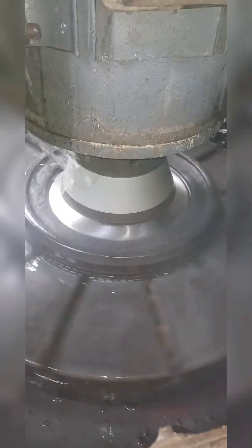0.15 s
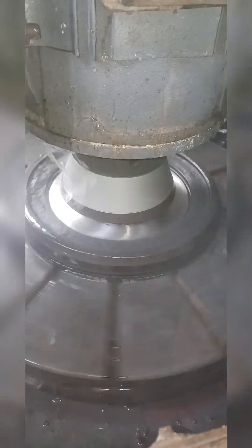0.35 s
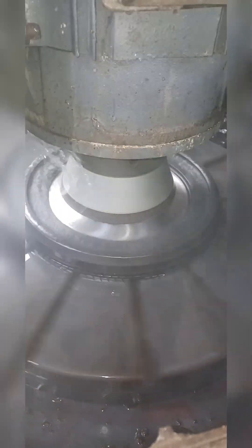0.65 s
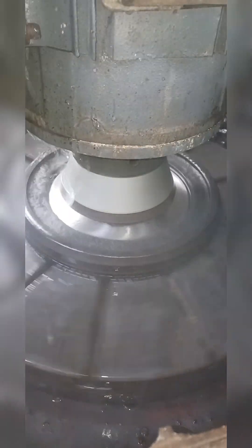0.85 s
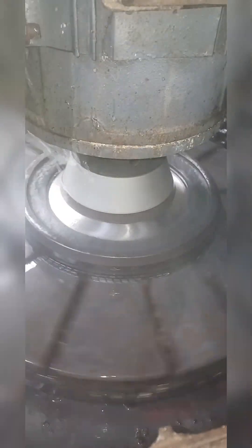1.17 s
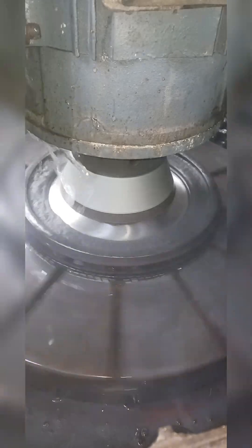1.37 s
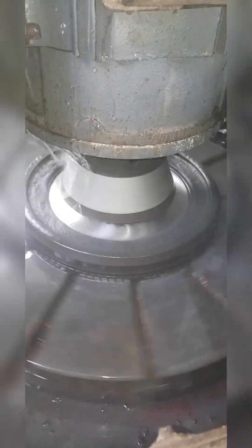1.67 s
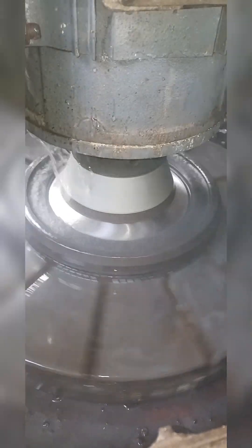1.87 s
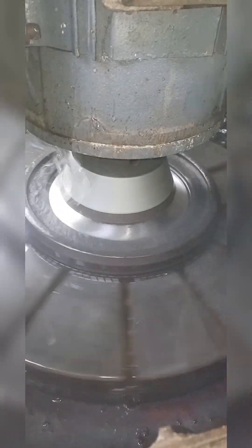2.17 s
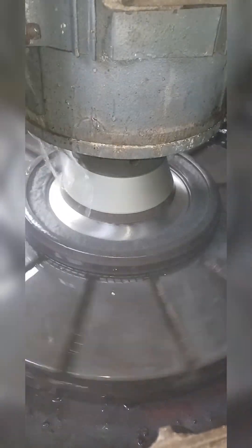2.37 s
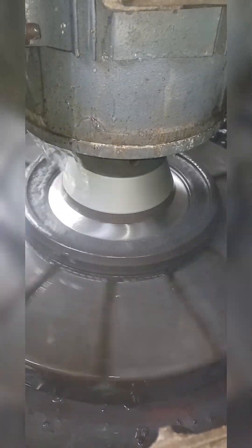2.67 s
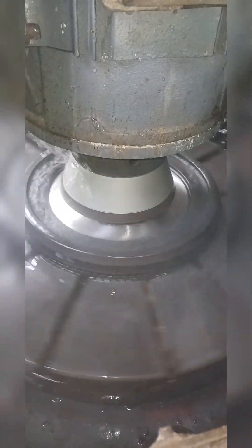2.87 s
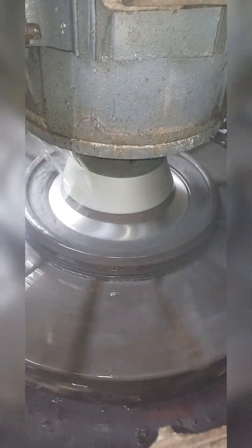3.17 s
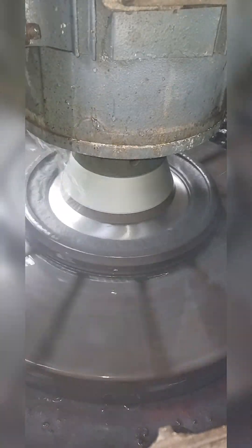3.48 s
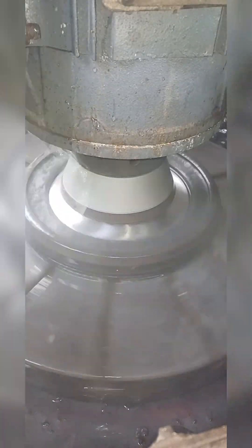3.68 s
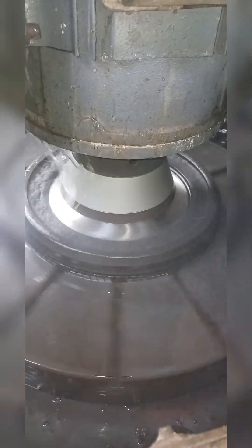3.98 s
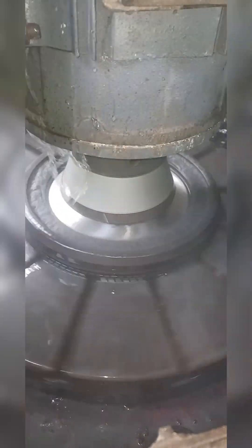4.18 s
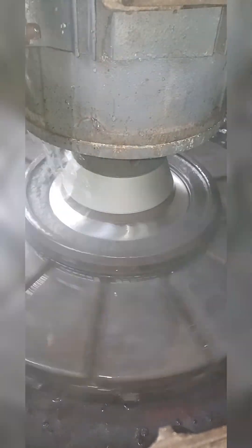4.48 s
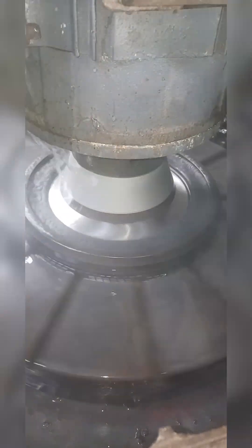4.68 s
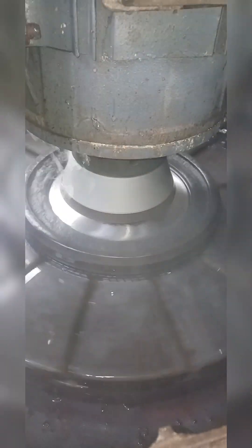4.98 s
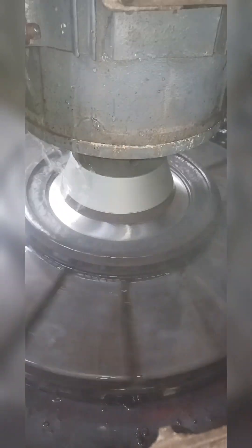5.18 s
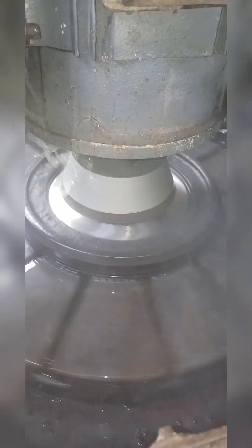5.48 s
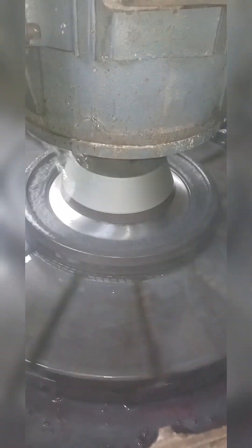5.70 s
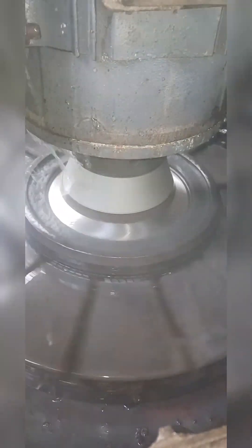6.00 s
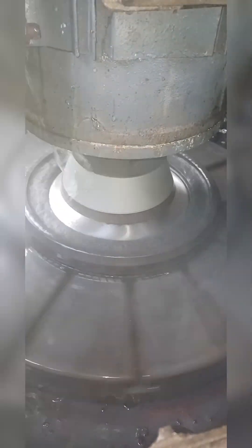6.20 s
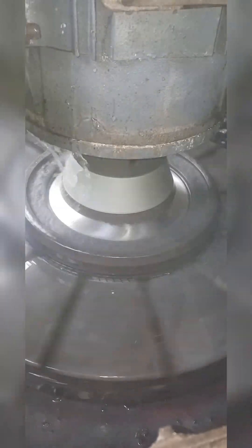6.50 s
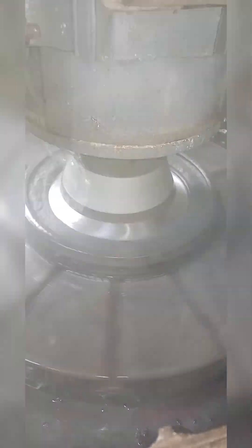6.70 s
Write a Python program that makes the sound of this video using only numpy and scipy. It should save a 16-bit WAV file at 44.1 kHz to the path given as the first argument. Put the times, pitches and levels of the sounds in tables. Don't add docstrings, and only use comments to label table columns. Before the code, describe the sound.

A cup grinding wheel cuts a rotating steel flywheel without pause. A very high, piercing squeal dominates, roughened by a fast flutter and swelling roughly every seven tenths of a second, with weaker surges between. Gritty hiss, splashing coolant, ringing steel and a low motor hum sit underneath. Close stereo microphone, brief workshop echo.

```python
import sys
import numpy as np
from scipy import signal
from scipy.fft import rfft, irfft, next_fast_len
from scipy.io import wavfile
from scipy.ndimage import uniform_filter1d

SR = 44100
rng = np.random.default_rng(int(sys.argv[2]) if len(sys.argv) > 2 else 0)


def unload_audio(sound):
    columns = np.transpose(np.atleast_2d(sound))
    steps = np.round(np.clip(columns, -1, 1) * 32767)
    wavfile.write(sys.argv[1], SR, steps.astype(np.int16))


def how_loud(loudness_db):
    steps = np.asarray(loudness_db, float) / 20
    return 10 ** steps


N = 302085
TIME = np.arange(N) / SR
WHEEL_HZ = 59.4


def unit(x):
    return x / np.sqrt(np.mean(np.abs(x) ** 2) + 1e-20)


def along(points, hz):
    f, v = np.transpose(points)
    return np.interp(np.log(hz + 1), np.log(f + 1), v)


def curves(rows, at=TIME, period=None):
    places, *cols = np.transpose(rows)
    return [np.interp(at, places, c, period=period) for c in cols]


def wobble(rate, t=TIME):
    knots = rng.standard_normal(int(N * rate / SR) + 2)
    return unit(np.interp(t * rate, np.arange(len(knots)), knots))


def fading(rate, steady, t):
    steady = np.clip(steady, 0, 1)
    drift = wobble(rate, t) + 1j * wobble(rate, t)
    return np.sqrt(steady) + np.sqrt((1 - steady) / 2) * drift


def rush(response):
    # (frequency [Hz], likeness of left and right [-1 to 1])
    alike = [(30, -0.45), (80, 0.11), (180, 0.54), (540, 0.09), (2800, -0.066), (3520, 0.47), (4400, -0.36),
             (14900, 0.15)]
    # (frequency [Hz], left over right [dB])
    lean = [(60, 0.5), (180, 1), (540, -2.5), (1640, 0), (4950, 3.5), (14900, 2.5)]
    m = next_fast_len(N + 8192)
    hz = np.fft.rfftfreq(m, 1 / SR)
    spread = np.arccos(np.clip(along(alike, hz), -1, 1)) / 2
    noise = rfft(rng.standard_normal((2, m))) * response(hz)
    mid, side = noise * [np.cos(spread), np.sin(spread)]
    tilt = how_loud(along(lean, hz) / 2)
    return unit(irfft([(mid + side) * tilt, (mid - side) / tilt], m)[:, :N])


def modes(hz, rows):
    return np.sqrt(sum(how_loud(2 * db) / (1 + ((hz * hz - c * c) / (hz * w + 1)) ** 2) for c, w, db in rows))


def table():
    # (time [s], squeal [dB], pure tone [dB], grit [dB], ring flare on the way in [dB])
    passes = [(0.09, -3, -8, -2, 3), (0.442, 3, 10, 3.5, 5), (0.77, -1.5, -2, -1.5, -2),
              (1.14, 1, 1.5, 0, 3.5), (1.45, -0.5, -4, -0.4, -1), (1.818, 2, 9.5, 0.7, 4),
              (2.128, -0.5, -0.5, 0, 0.5), (2.509, 0.5, 3.5, 0.5, 1.5), (2.83, 0.5, -4, -0.2, 0),
              (3.19, 0, 7, -0.4, 2.5), (3.499, 0.6, -2.5, -0.5, 1), (3.86, 1.4, 7.5, 1.2, 1.5),
              (4.171, 1, 1.5, -0.5, -5), (4.53, -1, -2.5, -0.5, -1), (4.872, -0.5, -3.5, -1, 0),
              (5.21, 0.8, -1, -1.5, 1.5), (5.535, 0.9, 4.5, 0.5, 0.5), (5.9, 0.3, -2.5, -1, 3.5),
              (6.221, 0.5, 2.5, -.6, 0), (6.581, -0.1, -2, 1, 3), (6.91, -3, 4, -2.5, 2)]
    s, *cols = np.transpose(passes)
    marks = np.arange(len(s)) / 2
    turns = np.interp(TIME, np.r_[2 * s[0] - s[2], s], np.r_[-1, marks])
    squeal_db, pure_db, grit_db = [np.interp(turns, marks, c) for c in cols[:-1]]
    flare_db = np.interp(turns + 0.19, marks, cols[-1])
    return turns, squeal_db, pure_db, grit_db, flare_db


def load():
    # (share of a turn, grit hiss [dB], low steel ring [dB], upper ring [dB], hum [dB])
    cut_turn = [(0.0, -40.5, -50, -46, -51), (0.08, -43.5, -45.5, -47.5, -47.5),
                (0.2, -46.5, -42.5, -46, -45), (0.33, -48.5, -43, -43, -46.5), (0.53, -43, -48, -50.5, -46),
                (0.65, -45, -43, -48.5, -45.5), (0.8, -46, -35.5, -44.5, -46),
                (0.9, -46.5, -38, -46.5, -47.5)]
    # (time [s], level [dB])
    motor = [
        (0, 2.5),
        (0.7, 0),
        (1.7, 2.5),
        (2.5, 0),
        (4.3, -2),
        (5.6, 0),
        (6.85, 1),
    ]
    turns, _, _, more_db, flare_db = table()
    grit_db, ring_db, upper_db, hum_db = curves(cut_turn, turns, period=1)
    grit_db = grit_db + more_db
    ring_db = ring_db + flare_db + 1.1 * wobble(10)
    upper_db = upper_db + 0.69 * flare_db + 2.0 * wobble(8)
    hum_db = hum_db + curves(motor)[0] + 1.1 * wobble(8) + 2.46 * wobble(24)
    return grit_db, ring_db, upper_db, hum_db


def lumps(beat, depth_db):
    return how_loud(depth_db * (beat + 0.4 * wobble(45) + 1.11 * wobble(200)))


def spindle_hum(hum_db):
    # (multiple of wheel rate, level [dB])
    hum = [(1, -25.5), (2, -4.5), (3, -6), (4, 1.5), (5, -7), (6, -6.5), (7, -15.5), (8, -9.5), (9, -12),
           (10, -19), (11, -18), (12, -13.5)]
    orders = [(k * WHEEL_HZ, 10.5, db) for k, db in hum]
    return how_loud(hum_db + 3.0) * rush(lambda hz: modes(hz, orders))


def steel_ring(beat, ring_db, upper_db):
    steel_hz = [2003, 3189, 3305, 3484, 3547, 3724, 3902, 3961, 4311, 4786, 5668, 10150]
    # (width [Hz], level [dB])
    steel = [(30, -10), (30, -7.5), (30, -8.5), (28.7, 0.5), (28, -2), (35, -7), (35, -3.5), (20, 2),
             (45, -3.5), (32, -2.5), (40, -7), (350, -22.5)]
    tones = [(c, w, db) for c, (w, db) in zip(steel_hz, steel)]
    flaring = tones[3:5] + tones[-1:]
    steady = tones[:3] + tones[5:6] + tones[8:-1]
    upper = tones[6:8]
    ring = how_loud(upper_db - 1.0) * unit(lumps(beat, 1.4) * rush(lambda hz: modes(hz, upper)))
    ring = ring + how_loud(1.188 * ring_db + 4.5) * unit(lumps(beat, 1.64) * rush(lambda hz: modes(hz, flaring)))
    return ring + how_loud(0.46 * ring_db - 23.5) * unit(lumps(beat, 1.0) * rush(lambda hz: modes(hz, steady)))


def grit_and_coolant(beat, grit_db):
    # (frequency [Hz], level per Hz [dB])
    grit = [(30, -20.5), (80, -11.5), (150, -9), (450, -0.5), (850, -6.5), (2000, -4), (2700, -5),
            (3600, -6.5), (5500, -5), (6700, -0.5), (7500, -4.5), (8600, -32), (9300, -42), (10200, -20.5),
            (11300, -22)]
    colour = lambda hz: how_loud(along(grit, hz))
    low_share = lambda hz: 1 / (1 + (hz / 2600) ** 4)
    splash = rush(lambda hz: colour(hz) * low_share(hz))
    hiss = rush(lambda hz: colour(hz) * (1 - low_share(hz)))
    splash = how_loud(1.25 * grit_db + 14) * unit(lumps(beat, 1.82) * splash)
    hiss = how_loud(0.37 * grit_db - 19) * unit(lumps(beat, 1.72) * hiss)
    return splash + hiss


def cutting():
    grit_db, ring_db, upper_db, hum_db = load()
    beat = np.cos(2 * np.pi * WHEEL_HZ * TIME + 1.05 * wobble(12))
    return spindle_hum(hum_db) + steel_ring(beat, ring_db, upper_db) + grit_and_coolant(beat, grit_db)


def contact():
    # (share of a turn, squeal [dB])
    squeal_turn = [(0.0, -10.5), (0.07, -14), (0.17, -21.5), (0.25, -17.5), (0.37, -21), (0.5, -15),
                   (0.62, -16), (0.76, -19.5), (0.88, -17.5)]
    # (share of a turn, tone over side tones [dB])
    lock_turn = [
        (0.0, 12),
        (0.06, 5),
        (0.12, -6),
        (0.3, -3),
        (0.5, -11),
        (0.63, -3),
        (0.8, -7),
        (0.9, 6),
    ]
    # (share of a turn, rise [Hz])
    bend = [(0.04, 18), (0.17, 93.5), (0.33, 117.5), (0.45, 97.5), (0.55, 116.5), (0.7, 149), (0.84, 63),
            (0.96, 1)]
    # (time [s], depth [dB])
    slips = [(0.0, 8), (0.221, 2.5), (0.36, -0.5), (0.66, 3), (1.01, 4.5), (1.38, 9), (2.028, 3.5),
             (2.26, 6), (2.7, 0.5), (3.08, -1.5), (4.31, -1), (4.45, 4), (4.791, 18), (5.13, 2.5),
             (5.42, 6), (5.7, 11), (5.79, 13.5)]
    slip_s = 0.014
    turns, more_db, purer_db, _, _ = table()
    level_db, = curves(squeal_turn, turns, period=1)
    pure_db, = curves(lock_turn, turns, period=1)
    bend_hz, = curves(bend, turns, period=1)
    slips_db = sum(db * np.exp(-((TIME - s) / slip_s) ** 2) for s, db in slips)
    pitch_hz = 6990 - 4.5 * TIME + bend_hz
    level_db = level_db + more_db - slips_db + 0.6 * wobble(14)
    return pitch_hz, level_db, pure_db + purer_db + 1.5 * wobble(15)


def squeal():
    # (multiple of wheel rate, level [dB])
    sidebands = [(-9, -26), (-8, -25.5), (-7, -34), (-6, -17.5), (-5, -22), (-4, -23), (-3, -12), (-2, -16),
                 (-1, -16), (1, -13.5), (2, -17.5), (3, -17.5), (4, -28), (5, -27.5), (6, -44), (7, -56.5)]
    # (frequency [Hz], width [Hz], lift [dB])
    face = (6992, 60, 7)
    face_hz, width_hz, lift_db = face
    pitch_hz, level_db, pure_db = contact()
    step = 8
    slow = TIME[::step]
    lift = lambda hz: how_loud(lift_db / (1 + ((hz - face_hz) / width_hz) ** 2))
    snap = lambda k: -0.6 * np.arctan((k + 1.2) / 1.6)
    turn = 2 * np.pi * WHEEL_HZ * slow + 0.83 * wobble(9, slow)
    bands, power = 0, 0
    for k, db in sidebands:
        gain = how_loud(db) * lift(pitch_hz[::step] + k * WHEEL_HZ)
        bands = bands + gain * fading(40, steady=0.76, t=slow) * np.exp(1j * (k * turn + snap(k)))
        power = power + gain ** 2
    share = 1 / (1 + how_loud(-2 * pure_db[::step]))
    pure = fading(25, steady=0.81, t=slow) * np.exp(1j * (snap(0) + 0.47 * wobble(22, slow)))
    shape = np.sqrt(share) * pure + np.sqrt((1 - share) / power) * bands
    shape = shape / np.sqrt(uniform_filter1d(np.abs(shape) ** 2, size=280))
    phase = 2 * np.pi * np.cumsum(pitch_hz + 7 * wobble(35)) / SR
    return how_loud(level_db + 2.5) * np.interp(TIME, slow, shape) * np.exp(1j * phase)


def ports(tone, wet_db, t60):
    # (frequency [Hz], left leads right [rad])
    port_lead = [(6400, -5), (6660, -4.4), (6760, -3.8), (6840, -1.2), (6920, -1), (7000, 0), (7040, .7),
                 (7080, 2.3), (7125, 4), (7200, 4.3), (7240, 3.3), (7360, 1.7)]
    m = next_fast_len(N + SR // 4)
    t = np.arange(SR // 4) / SR
    tail = rng.standard_normal((2, len(t))) * how_loud(-60 * t / t60)
    echo = how_loud(wet_db) * np.fft.fft(tail / np.linalg.norm(tail[0]), m)
    lead = np.outer([0.5, -0.5], along(port_lead, np.arange(m) * SR / m))
    heard = np.fft.ifft(np.fft.fft(tone, m) * (np.exp(1j * lead) + echo))[:, :N]
    return heard / np.sqrt(1 + how_loud(2 * wet_db))


def microphone(tone):
    tone = tone / (1 + (np.abs(tone) / 0.68) ** 4) ** 0.25
    halo = rush(lambda hz: 1 / (1 + ((hz - 13900) / 600) ** 2) / (1 + (hz / 14300) ** 80))
    octave = how_loud(-27.5) * (tone ** 2).real + how_loud(-40.0) * np.abs(tone) ** 2.16 * halo
    return how_loud([[0.45], [-0.45]]) * (tone.real + octave)


def scene():
    return cutting() + microphone(ports(squeal(), wet_db=-16, t60=0.35))


def top_cut(x):
    return signal.sosfilt(signal.butter(12, 14600, fs=SR, output="sos"), x)


def record(dry):
    return top_cut(dry)


dry = scene()
out = record(dry)
unload_audio(out)
```